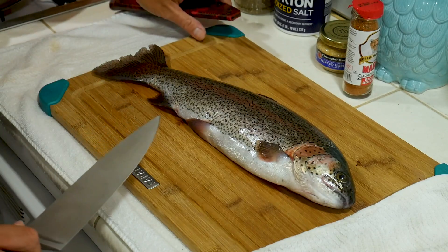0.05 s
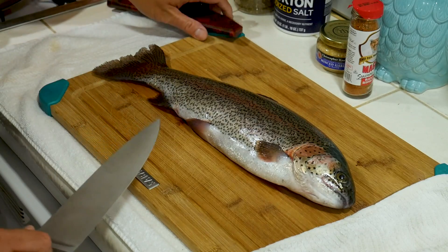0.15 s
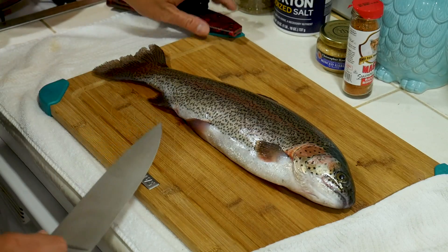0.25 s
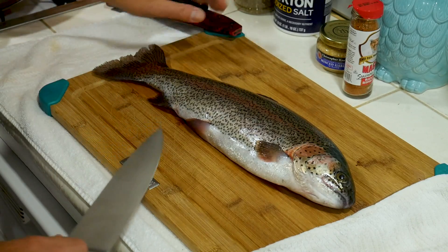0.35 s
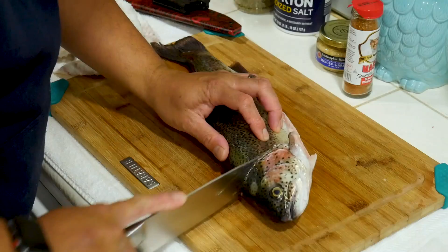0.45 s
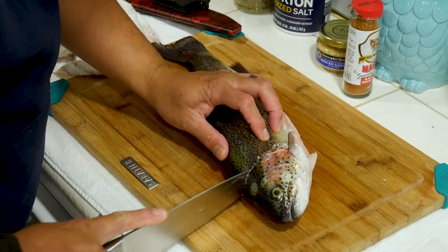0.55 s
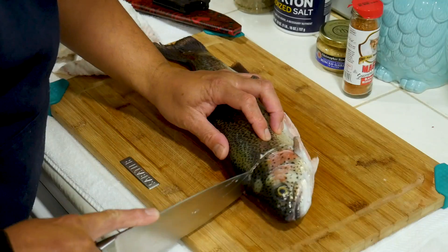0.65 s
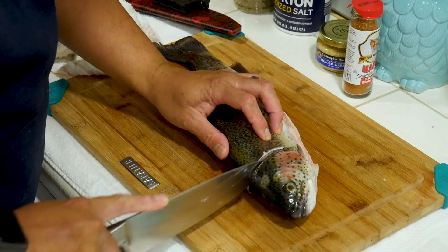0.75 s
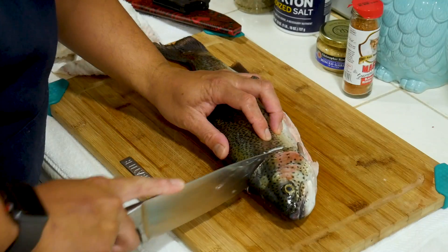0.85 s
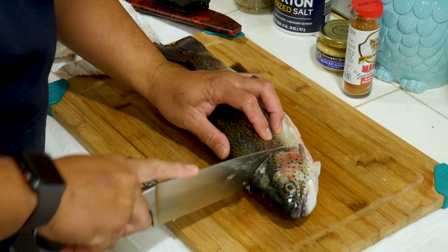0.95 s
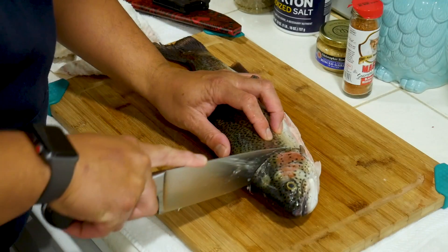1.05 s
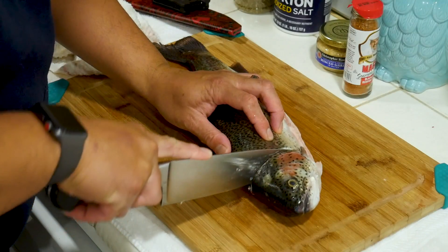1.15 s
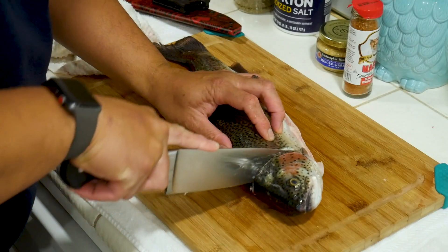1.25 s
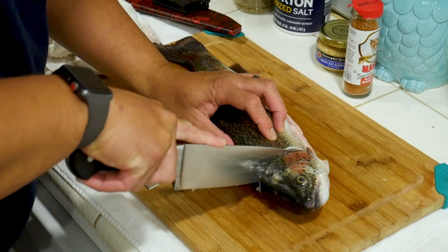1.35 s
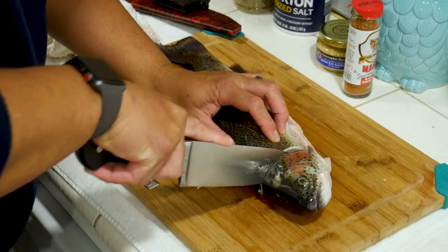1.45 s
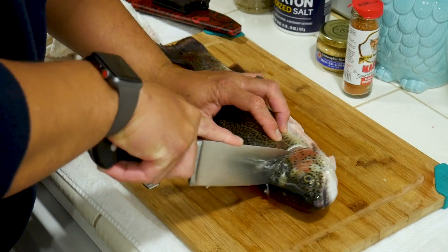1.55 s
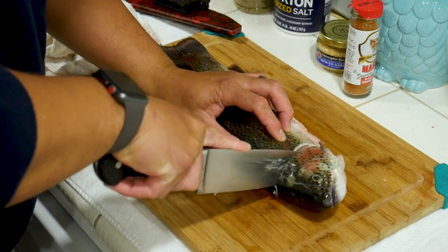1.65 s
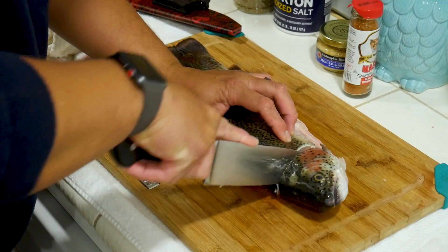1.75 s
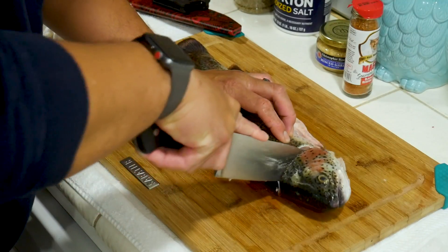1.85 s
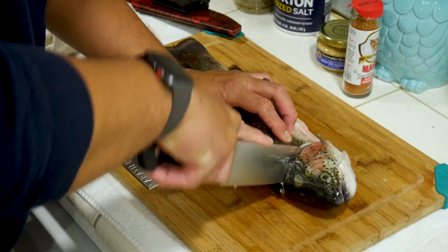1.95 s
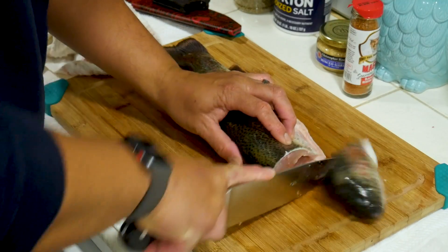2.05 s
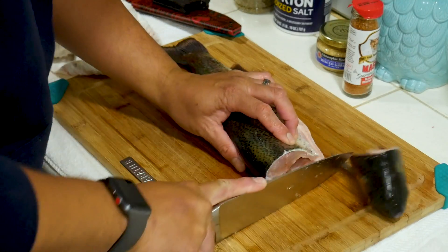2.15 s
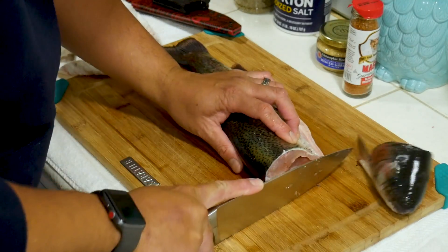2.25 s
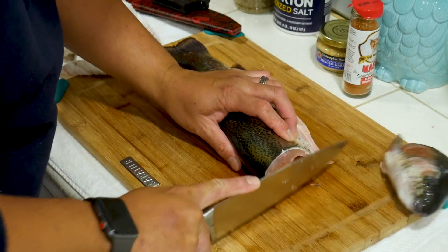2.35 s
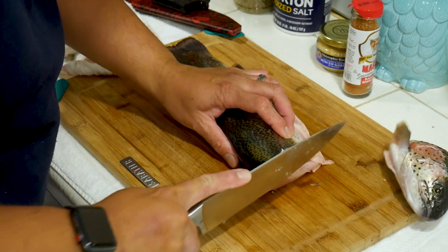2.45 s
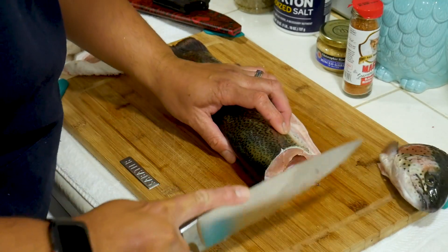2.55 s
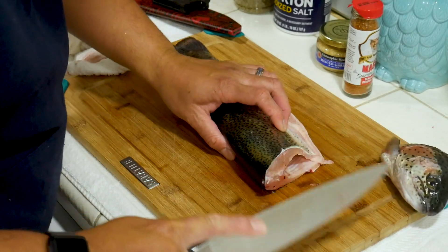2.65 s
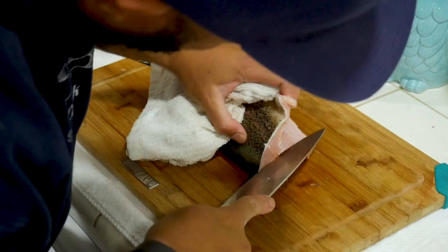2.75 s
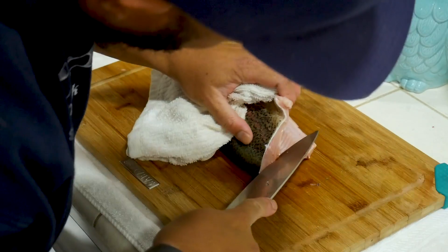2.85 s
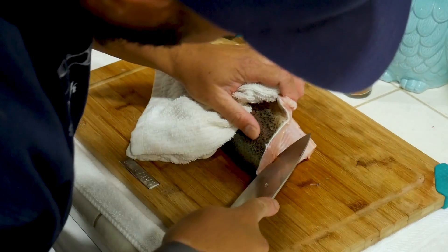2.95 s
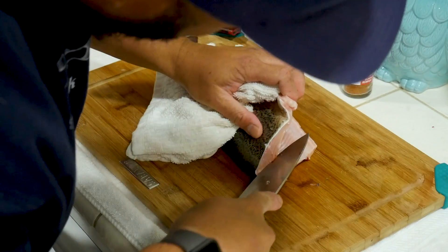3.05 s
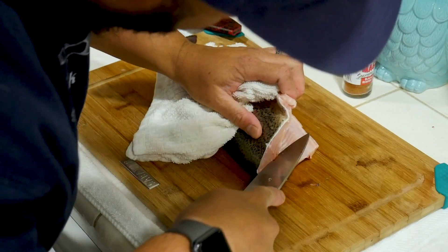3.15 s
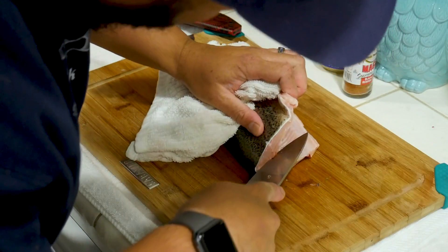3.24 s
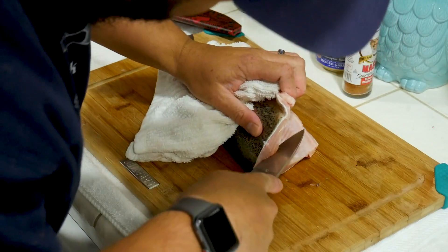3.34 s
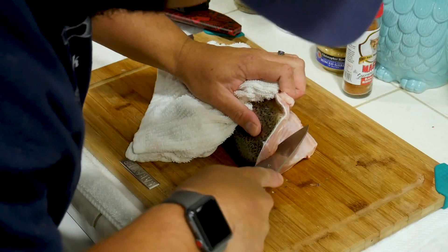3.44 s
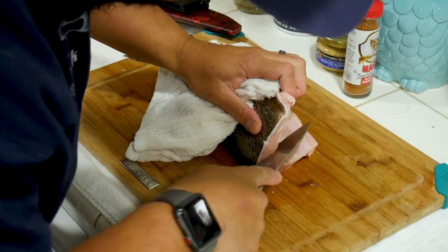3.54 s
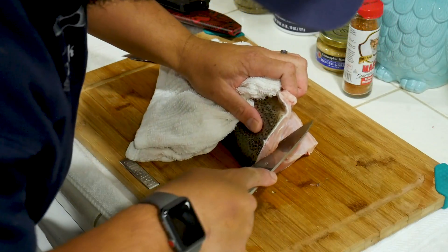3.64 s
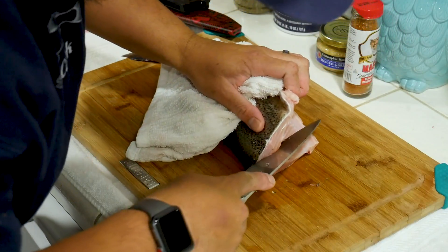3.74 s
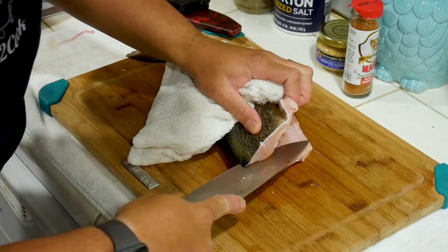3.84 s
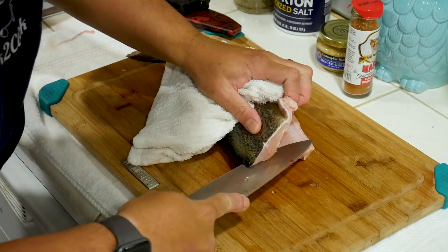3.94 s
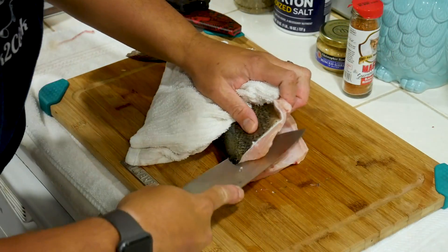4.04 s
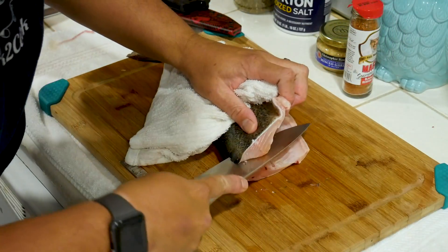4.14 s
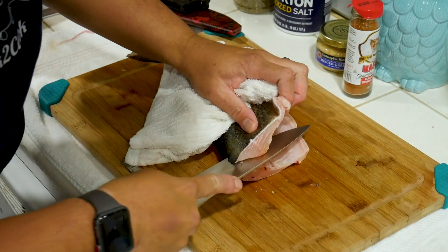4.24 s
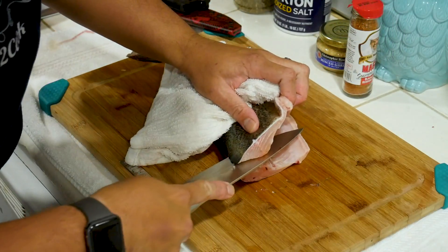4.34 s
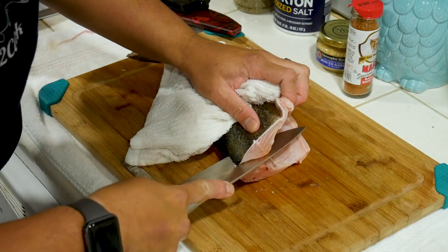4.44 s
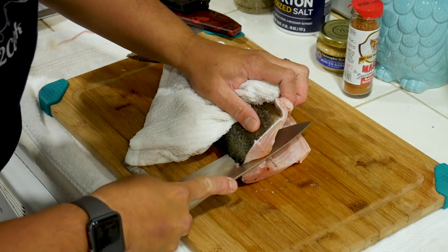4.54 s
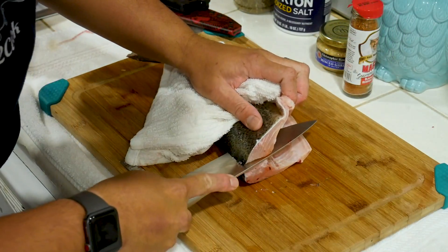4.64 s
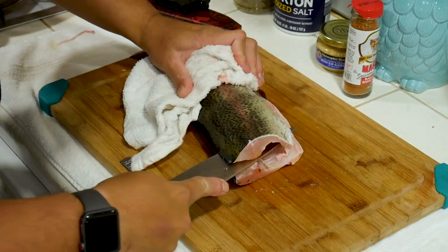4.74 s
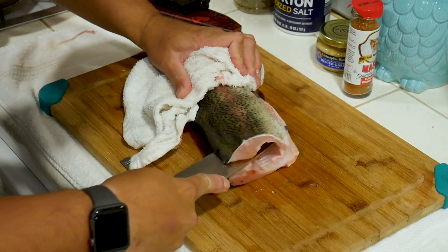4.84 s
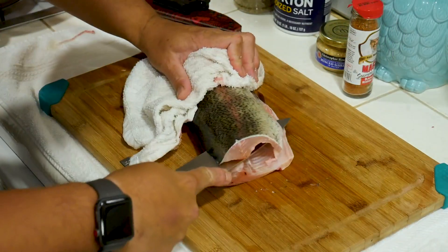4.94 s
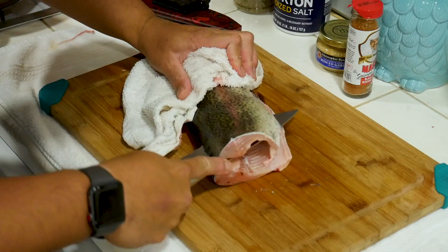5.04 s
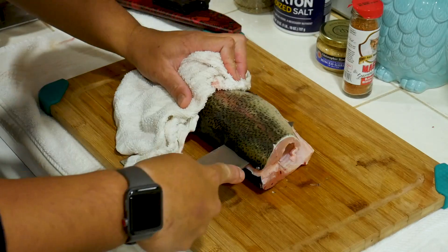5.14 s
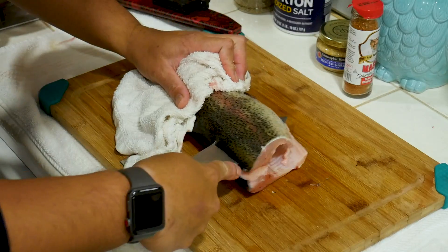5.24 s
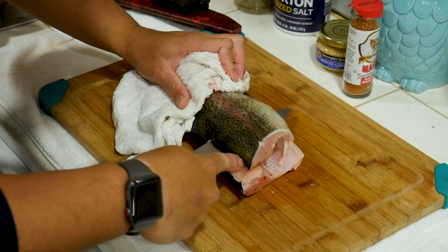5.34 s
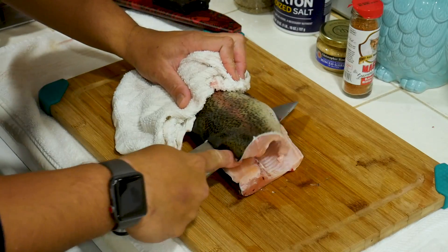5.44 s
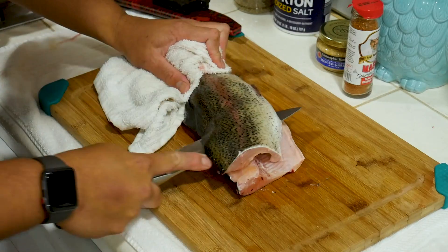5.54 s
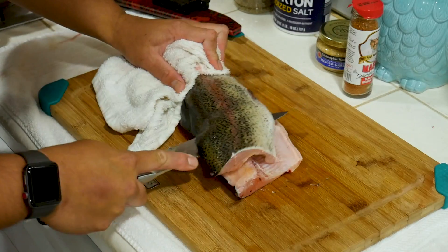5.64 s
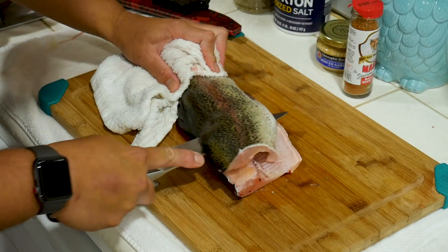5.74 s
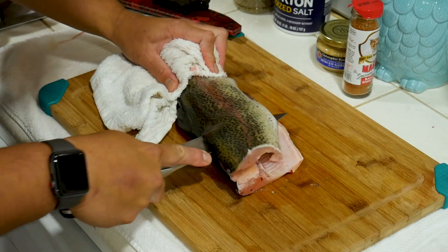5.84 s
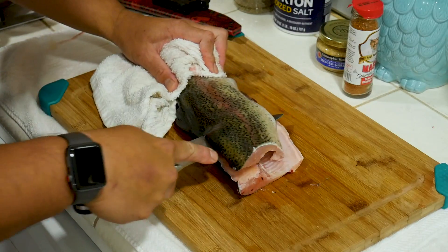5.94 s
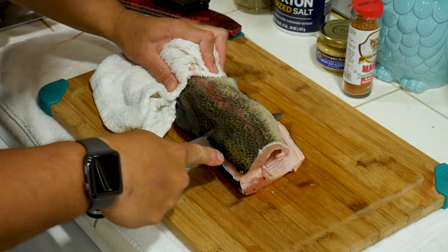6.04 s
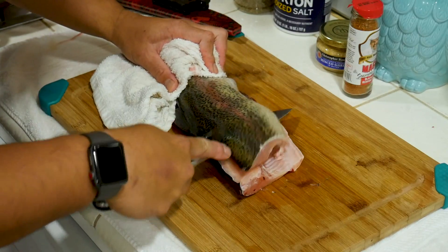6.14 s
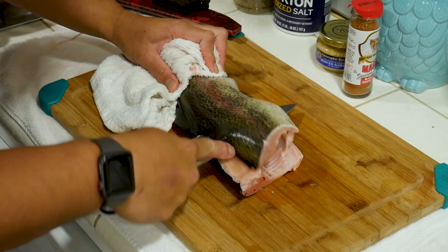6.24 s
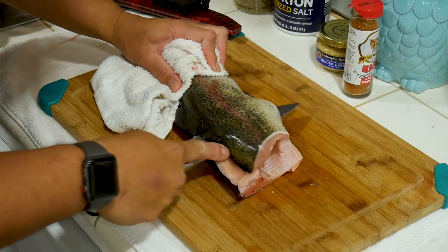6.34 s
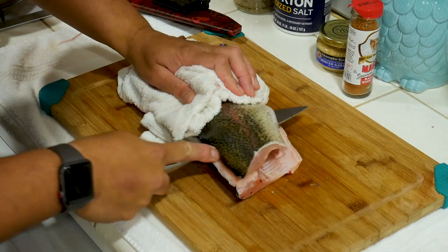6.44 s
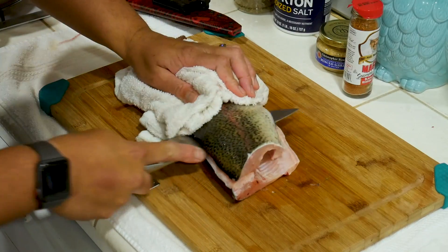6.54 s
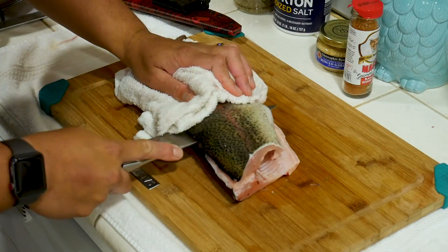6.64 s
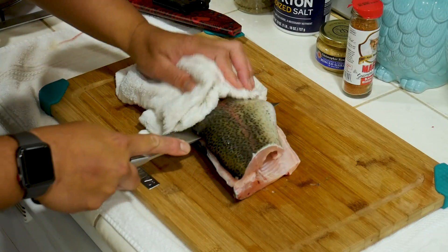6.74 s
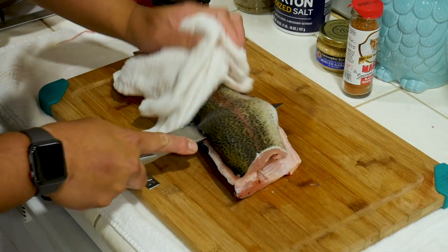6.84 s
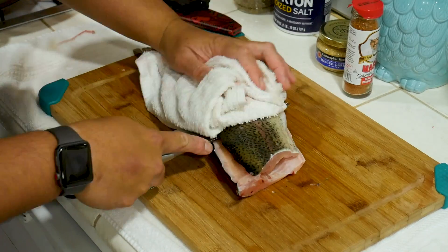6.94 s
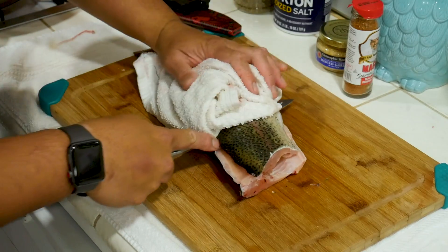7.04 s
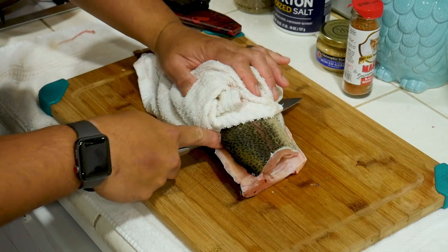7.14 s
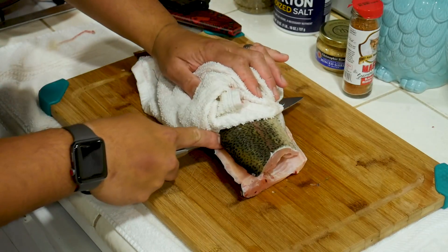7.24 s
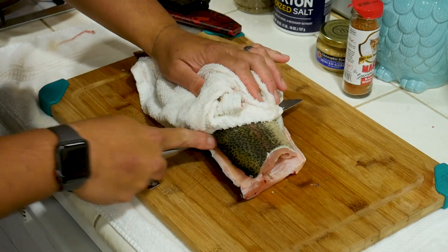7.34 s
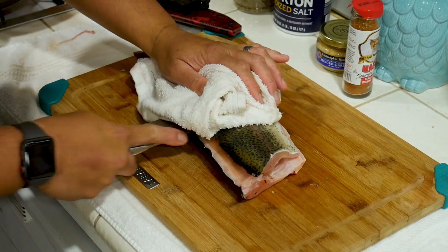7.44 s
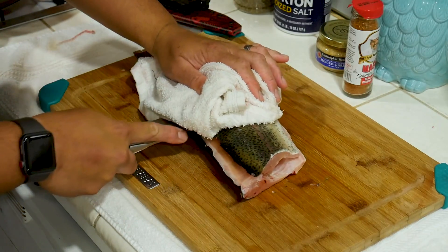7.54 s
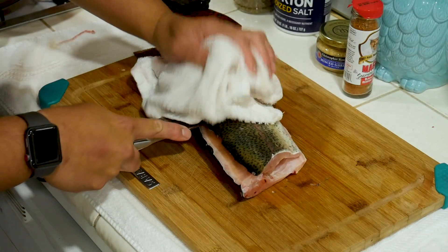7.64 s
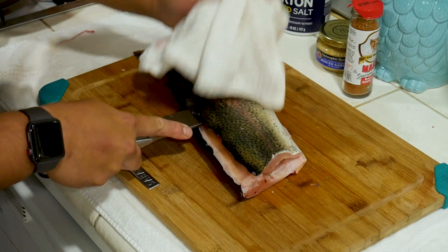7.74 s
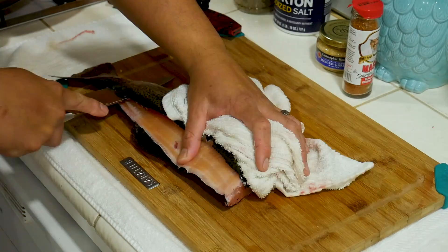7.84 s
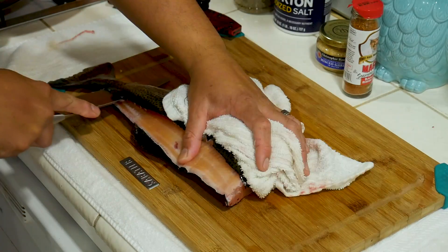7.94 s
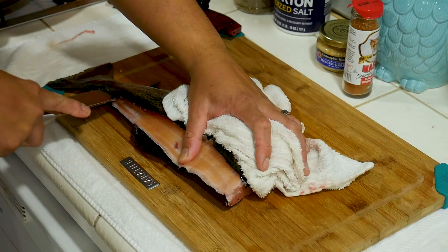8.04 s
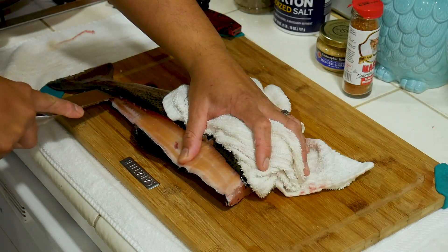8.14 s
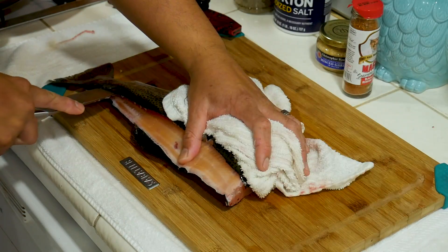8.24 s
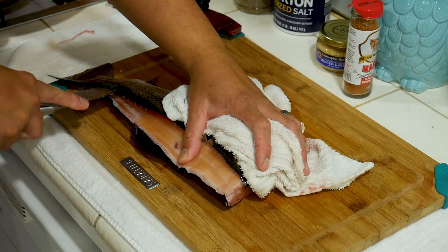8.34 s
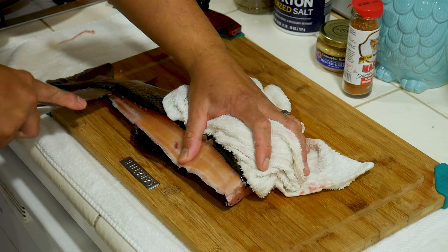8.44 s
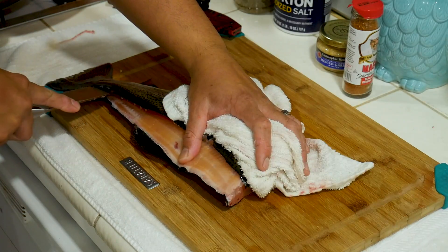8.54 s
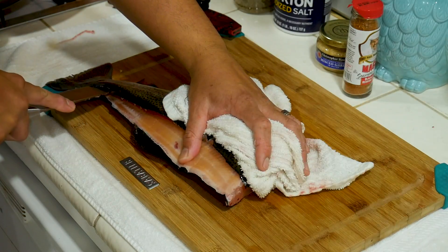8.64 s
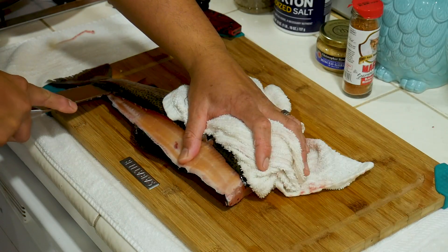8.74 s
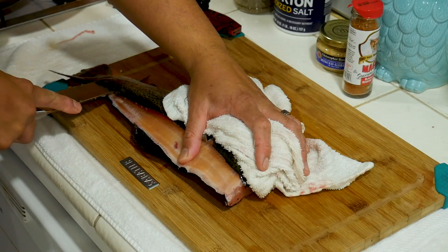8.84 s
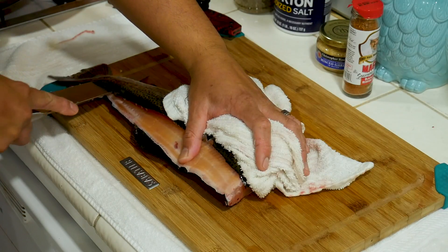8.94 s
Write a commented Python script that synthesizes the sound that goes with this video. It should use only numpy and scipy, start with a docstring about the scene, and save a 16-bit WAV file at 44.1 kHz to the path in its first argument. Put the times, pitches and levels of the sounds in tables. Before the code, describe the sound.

Utensil clatters onto a wooden board, then a knife crunches through fish bones with one very sharp crack, followed by gritty slicing strokes in a small kitchen.

```python
"""A fish is filleted on a bamboo board in a small tiled kitchen, close to one microphone.
First a utensil rattles down: rough contacts ring the board modes and low swings rock it on the counter.
From 0.5 s the knife strokes hiss as grainy noise through steel resonances, and rubs sing as throbbing narrow noise.
Bones snap as clicks with noise sprays, hardest at 1.85 s; fainter landings are scattered from 1.2 to 2.1 s.
Throughout, tiles answer with decaying noise echoes, over shaped-noise hum, rumble and very faint stereo noise."""
import sys
import numpy as np
from scipy import signal
from scipy.fft import rfft, irfft, next_fast_len
from scipy.io import wavfile
from scipy.ndimage import uniform_filter1d, map_coordinates

SR = 44100
rng = np.random.default_rng(int(sys.argv[2]) if len(sys.argv) > 2 else 0)


def master_out(mix):
    """Clip the mix to full scale and print it as 16-bit PCM to the path in sys.argv[1]."""
    frames = np.transpose(np.atleast_2d(mix))
    ceiling = np.clip(frames, -1, 1)
    pcm = np.round(ceiling * 32767).astype(np.int16)
    wavfile.write(sys.argv[1], SR, pcm)


N = 396459

# bones giving way under the edge: t/s, force level/dB, click pitch f/Hz
BONE_SNAPS = [(.5658, -39.5, 3970), (.6918, -47, 8000), (0.7567, -45.5, 7460), (1.1429, -28.5, 8360),
              (1.2056, -26.5, 8940), (1.4677, -25.5, 8350), (1.496, -30.5, 8600), (1.516, -17, 8400),
              (1.5314, -15, 7400), (1.5513, -31, 7800), (1.8538, -1, 5400), (2.0242, -22.5, 4310),
              (2.0323, -10.5, 3960), (2.0406, -8, 7800), (2.0467, -10, 6750), (2.0506, -8, 3540),
              (2.5939, -44.5, 7030), (3.1661, -40.5, 13500), (3.3038, -19.5, 12600), (3.3468, -18, 4960),
              (3.3532, -21, 3400), (3.3826, -16, 7700), (3.4163, -27, 7900), (3.7973, -29, 8300),
              (3.8734, -45, 8600), (4.0328, -25, 8700), (4.0591, -24, 8390), (4.0684, -23, 2840),
              (4.0754, -17.5, 8000), (4.0975, -20, 7740), (4.124, -24, 2750), (4.4794, -35, 12300),
              (4.529, -20.5, 12400), (4.5595, -29.5, 7340), (4.8643, -29.5, 8400), (4.876, -29.5, 7010),
              (4.8986, -27.5, 8050), (4.9256, -25.5, 13100), (4.955, -27.5, 10000), (4.9908, -28, 7400),
              (5.014, -24, 13700), (5.0534, -18, 9700), (5.0865, -27.5, 7250), (5.2369, -26, 7950),
              (5.2726, -26.5, 7560), (5.2917, -17.5, 8200), (5.3541, -18, 4100), (5.3674, -22, 7240),
              (5.3849, -27, 7300), (5.6295, -16, 8600), (6.072, -36.5, 7450), (6.0822, -37, 4600),
              (6.2136, -26.5, 8500), (6.2272, -19.5, 6300), (6.5858, -16, 2800), (6.587, -13, 7780),
              (6.614, -24, 3400), (6.629, -27, 7880), (6.6404, -28, 14600), (6.6527, -24, 7670),
              (6.8877, -44, 3165), (6.922, -39.5, 9000), (7.0568, -30, 6000), (7.0723, -29, 3630),
              (7.148, -44, 11000), (7.3453, -48, 7370), (7.4011, -33, 3390), (7.4115, -18, 3700),
              (7.4176, -19, 4000), (7.4257, -18, 5450), (7.4398, -22, 4430), (7.4796, -22, 4900),
              (7.5158, -31, 3910), (7.7574, -50, 7600), (7.858, -50, 8700), (7.9543, -43, 7508),
              (8.317, -40, 8440), (8.402, -32, 8670), (8.5352, -19, 2730), (8.5622, -35, 7300)]
# knife strokes: start t/s, rise t/s, fall t/s, firmest level/dB, tint f/Hz
KNIFE_STROKES = [(.498, .033, 0.14, -60, 7500), (.69, .03, .06, -66, 12000), (0.899, .03, 0.17, -58, 7800),
                 (1.21, .02, .2, -59, 8000), (1.457, 0.072, 0.032, -44.5, 7800),
                 (2.022, 0.025, .028, -26, 8250), (2.338, 0.042, 0.15, -59.5, 7550),
                 (3.3, .064, 0.067, -53.5, 8000), (3.783, .012, 0.1, -58, 8000),
                 (4.023, 0.05, 0.045, -37, 8000), (4.27, 0.068, 0.064, -56.5, 8200),
                 (4.468, 0.092, .11, -52, 8140), (4.864, 0.013, 0.16, -45.5, 7600),
                 (5.01, 0.035, .105, -47, 7600), (5.194, 0.086, 0.061, -47, 7900),
                 (5.353, .012, .071, -41, 7150), (5.541, .05, 0.17, -53.5, 5800),
                 (6.016, 0.082, .045, -58.5, 4481), (6.132, 0.081, .22, -53, 8700),
                 (6.528, 0.053, 0.016, -55, 2800), (6.592, 0.037, 0.071, -40, 4500),
                 (6.76, .13, .05, -58, 3300), (7.05, .025, .1, -52.5, 6000), (7.36, .065, 0.1, -41, 3902),
                 (7.891, 0.18, 0.182, -46.5, 7000), (8.288, 0.07, .073, -46.5, 8300),
                 (8.542, .03, .15, -46, 7900), (8.778, .03, .12, -56, 8050)]
# spectrum of the sliding edge: f/Hz, level per Hz/dB
EDGE_SPECTRUM = [(240, -37), (400, 4), (949, 2), (2180, -3.5), (2840, -3.5), (3870, -2), (7750, 0),
                 (9920, -7), (13700, -3), (16000, -14)]
# blade resonances: f/Hz, width f/Hz, level/dB
BLADE_MODES = [(3920, 640, -23.5), (5050, 200, -7), (7530, 480, -5.5), (8640, 620, 2), (12700, 850, -9)]
# blade or board set singing by a rub: start t/s, end t/s, bending f/Hz, level/dB, squeak f/Hz, squeak level/dB
RUB_SONGS = [(.5, .654, 1590, -60, 2810, -66), (.9, 1.04, 1450, -70, 2800, -68),
             (4.27, 4.333, 1140, -70, 4230, -65), (4.469, 4.677, 1103, -65, 3320, -64),
             (4.871, 4.96, 1005, -49, 4080, -54), (4.96, 5.054, 1000, -50, 3850, -55),
             (5.054, 5.147, 1005, -52.5, 3520, -51), (5.232, 5.31, 1150, -50, 3720, -70),
             (5.355, 5.422, 1153, -42, 3705, -54), (6.025, 6.103, 1300, -70, 4640, -65),
             (6.209, 6.298, 1320, -64, 3225, -57.5), (6.6, 6.689, 1304, -44, 3530, -52),
             (6.6, 6.667, 1830, -48, 4520, -67), (7.05, 7.2, 1140, -65, 3735, -61),
             (7.395, 7.466, 1194, -41.5, 3800, -47), (8.021, 8.2, 1410, -62, 5160, -63),
             (8.31, 8.42, 1408, -61, 4210, -63)]
# utensil or blade landing on the board: t/s, level/dB, favoured f/Hz
LANDINGS = [(.057, -13.5, 1510), (.064, -12.5, 1460), (.117, -17.5, 1500), (.124, -15, 1470),
            (.167, -19.5, 900), (.211, -7.5, 816), (.222, -14, 600), (.275, -15.5, 1290), (.28, -16, 910),
            (.31, -20, 1200), (.324, -18, 1400), (.363, -28.5, 1480), (1.205, -35, 750), (1.5, -31, 350),
            (1.855, -27, 402), (1.91, -33, 700), (1.938, -34, 704), (1.981, -38, 700), (2.024, -21.5, 458),
            (2.033, -24, 280), (2.044, -21.5, 449), (2.088, -27, 600), (2.119, -30, 600)]
# bamboo board modes: f/Hz, level/dB, t60/s
BOARD_MODES = [(275, -5, .15), (349.5, -2, 0.066), (516.3, 4, .09), (651, -1.5, 0.039), (842, 5.5, 0.045),
               (903, -5.5, 0.033), (1264, -12, 0.046), (1484, 2.5, 0.07), (1697, -12.5, 0.056),
               (2060, -8, .04), (2430, 3, .05), (2760, -5, .05), (3300, -17, .04)]
# board rocking on the counter: t/s, level/dB
BOARD_THUMPS = [(.051, -40), (.21, -25.5), (1.21, -45), (1.51, -35), (1.857, -44), (2.049, -31.5),
                (3.347, -34), (5.619, -45), (6.603, -34.5), (7.079, -48), (7.419, -40)]
# tile reverberation: f/Hz, t60/s
TILE_T60 = [(200, 0.57), (1400, 0.67), (4000, 0.67), (10000, 0.43)]
# moments when the echoes break off: t/s
ECHO_STOPS = [.5, 2.02, 2.6, 3.895, 5.16, 6.91, 7.85]
# spectrum of kitchen air and appliances: f/Hz, level per Hz/dB
HUM_SPECTRUM = [(12, -46), (20, -11.5), (65, -1.5), (160, -14.5), (189, -5), (323, -6), (535, -17.5),
                (583, -14), (863, -20.5), (966, -22), (1600, -26), (1790, -28.5), (4050, -37), (13200, -41),
                (16500, -43)]
# background levels: t/s, hum level/dB, rumble level/dB
HUM_LEVELS = [(.6, -54, -61), (1.95, -52, -58), (2.14, -54, -55), (3.03, -53.5, -61), (3.43, -53, -55),
              (3.64, -53.5, -59.5), (5.34, -52.5, -54), (6.93, -51.5, -56), (7.59, -51, -53),
              (7.87, -53.5, -58), (8.99, -53, -57.5)]
# spectrum of the very faint stereo noise: f/Hz, level per Hz/dB
STEREO_NOISE_SPECTRUM = [(12, -52), (20, -7), (222, -17), (367, -18), (446, -8.5), (590, -16.5),
                         (12800, -16), (16000, -25)]

# parts of a snap: dB at 0 dB force, dB per dB of force
CLICK_DB, CLICK_DB_PER_DB, SPRAY_DB, SPRAY_DB_PER_DB = 3.5, 1.37, -9, .84
PUSH_DB, PUSH_DB_PER_DB, PUSH_MAX_DB = -11.5, .8, -24  # flesh returns no more than the maximum
SPRAY_T60_S, SPRAY_T60_S_PER_DB = .056, .0007  # splinters fly longer after a harder break
TICKS_PER_S, TICK_MIN_FORCE_DB = 1, -54  # faint wet ticks of scales and fingers
BITE_DB_PER_S, LIFT_DB, LIFT_DB_PER_S, ROUND_POWER = 130, 4, 55, 1.5  # stroke swell, easing off and linger
SONG_RISE_SHARE = .015  # the pitch climbs as the blade digs in
CRACK_DB, CRACK_DB_PER_DB = -19.5, .45  # the bright crack of a landing grows less than its ring
ROCK_HZ, ROCK_SCATTER_SHARE = 70.3, .06
NEW_ECHO_S, ECHO_DB = .4, -8.0
HUM_SPLIT_HZ, TOP_HZ = 110, 16700


def amp(db):
    """Gain of a level in dB."""
    return 10 ** (np.asarray(db) / 20)


def unit(x):
    """x at rms 1."""
    return x / np.sqrt(np.mean(x ** 2) + 1e-20)


def along(points, hz):
    """Interpolates (Hz, value) points on a log frequency axis."""
    f, v = np.transpose(points)
    return np.interp(np.log(hz + 1), np.log(f + 1), v)


def curves(rows):
    """One value per sample for each column after the time."""
    s, *cols = np.transpose(rows)
    return [np.interp(np.arange(N) / SR, s, c) for c in cols]


def wobble(knots_per_s):
    """A smooth random curve through normal knots."""
    knots = rng.standard_normal(int(N * knots_per_s / SR) + 4)
    return map_coordinates(knots, [np.arange(N) * knots_per_s / SR])


def filtered(x, response):
    """x times a complex response of frequency."""
    n = x.shape[-1]
    m = next_fast_len(n + 4096)
    return irfft(rfft(x, m) * response(np.fft.rfftfreq(m, 1 / SR)), m)[..., :n]


def resonance(hz, centre_hz, width_hz):
    """Causal response of one resonance, gain 1 at its centre."""
    return 1j * hz * width_hz / (centre_hz ** 2 - hz ** 2 + 1j * hz * width_hz + 1e-9)


def add(track, s, sound):
    """Mixes a sound into the track from time s."""
    track[round(s * SR):][:len(sound)] += sound


def snaps():
    """A bone breaks: a click that rules the hardest breaks, a spray of splinters, a small push into the flesh."""
    out, t = np.zeros(N + SR), np.arange(SR // 10) / SR
    draws = rng.random((int(TICKS_PER_S * N / SR), 3))
    ticks = [(a * N / SR, TICK_MIN_FORCE_DB + 6 * b, 5000 + 7000 * c) for a, b, c in draws]
    for s, db, hz in BONE_SNAPS + ticks:
        noise = rng.standard_normal((2, len(t)))
        click = np.sin(2 * np.pi * hz * t) * np.exp(-((t - .0004) / .00022) ** 2)
        spray_t60_s = max(SPRAY_T60_S + SPRAY_T60_S_PER_DB * db, .003)
        spray = filtered(noise[0] * amp(-60 * t / spray_t60_s),
                         lambda f: amp(-5.5) * resonance(f, 8500, 13000) + resonance(f, hz, 0.082 * hz))
        push = filtered(noise[1] * amp(-60 * t / 0.042), lambda f: resonance(f, 900, 1800))
        push_db = min(PUSH_DB + PUSH_DB_PER_DB * db, PUSH_MAX_DB)
        snap = amp(CLICK_DB + CLICK_DB_PER_DB * db) * click
        snap += amp(SPRAY_DB + SPRAY_DB_PER_DB * db) * spray
        add(out, s, snap + amp(push_db) * push)
    return out[:N]


def blade_hiss():
    """The edge catches on scales and ribs: uneven grains in a hiss, coloured by the steel."""
    grain_gain = amp(np.minimum(5.4 * rng.exponential(1, N), 18))
    grains = rng.standard_normal(N) * grain_gain * (rng.random(N) < 900 / SR)  # 900 a second on average
    rough = rng.standard_normal(N) * amp(1.2 * wobble(60) + 1.84 * wobble(250))
    rub = unit(rough) + 0.33 * unit(grains)

    def steel(hz):
        """The blade resonances stand on a flat response."""
        return 1 + sum(amp(db) * np.abs(resonance(hz, c, w)) ** 2 for c, w, db in BLADE_MODES)

    hiss = unit(filtered(rub, lambda hz: amp(along(EDGE_SPECTRUM, hz)) * steel(hz)))
    # random soft patches in time and frequency make the hiss colour uneven
    z = signal.stft(hiss, nperseg=256)[2]
    patches = uniform_filter1d(rng.standard_normal(z.shape), size=5, axis=0)
    patches = uniform_filter1d(patches, size=12, axis=1)
    return signal.istft(z * amp(2.6 * unit(patches)), nperseg=256)[1]


def strokes():
    """Each stroke tints the hiss, swells to its firmest moment, lingers there and eases off."""
    out, hiss = np.zeros(N + SR), blade_hiss()
    for start, rise, fall, firm_db, tint_hz in KNIFE_STROKES:
        t = np.arange(round((rise + fall) * SR)) / SR
        piece = filtered(hiss[round(start * SR):][:len(t)],
                         lambda hz: 1 + 0.44 * resonance(hz, tint_hz, 0.15 * tint_hz))
        depth_db = np.where(t < rise, BITE_DB_PER_S * rise, LIFT_DB + LIFT_DB_PER_S * fall)
        slackness = np.interp(t, [0, rise, rise + fall], [1, 0, 1])  # 0 at the firmest moment
        level_db = firm_db - depth_db * slackness ** ROUND_POWER
        fade = np.clip(np.minimum(t, rise + fall - t) / 0.01, 0, 1)
        add(out, start, fade * amp(level_db) * unit(piece))
    return out[:N]


def songs():
    """Slipping contact keeps a bending mode and a sliding squeak going: narrow noise that throbs with the slips."""
    out = np.zeros(N + SR)
    blur_hz = np.array([[65], [65], [170], [170]])  # bend pair, squeak pair
    flutter = filtered(rng.standard_normal((4, N)), lambda hz: 1 / (1 + (hz / blur_hz) ** 2))
    flutter = flutter * amp(4 * wobble(55))
    for start, end, bend_hz, bend_db, squeak_hz, squeak_db in RUB_SONGS:
        u = np.linspace(0, 1, round((end - start) * SR))
        a, b, c, d = flutter[:, round(start * SR):][:, :len(u)]
        phase_per_hz = 2 * np.pi * np.cumsum(1 + SONG_RISE_SHARE * (u - .5)) / SR
        bend_phase, squeak_phase = bend_hz * phase_per_hz, squeak_hz * phase_per_hz
        bend = unit(a * np.sin(bend_phase) + b * np.cos(bend_phase))
        squeak = unit(c * np.sin(squeak_phase) + d * np.cos(squeak_phase))
        fade = amp(-7 * u) * np.clip(np.minimum(u, 1 - u) / 0.044, 0, 1)
        add(out, start, fade * (amp(bend_db) * bend + amp(squeak_db) * squeak))
    return out[:N]


def knocks():
    """A short rough contact rings the board; the place struck favours the modes near one pitch."""
    out, t = np.zeros(N + SR), np.arange(SR // 3) / SR
    for s, db, favoured_hz in LANDINGS:
        chance, noise = rng.standard_normal((len(BOARD_MODES), 2)), rng.standard_normal((3, len(t)))
        ring = np.zeros(len(t))
        for (hz, level_db, t60_s), (level_chance, pitch_chance) in zip(BOARD_MODES, chance):
            mode_db = level_db + 3 * level_chance - 8.5 * abs(np.log2(hz / favoured_hz))
            mode = np.sin(2 * np.pi * hz * (1 + 0.025 * pitch_chance) * t)
            ring += amp(mode_db - 60 * t / t60_s) * mode
        contact = (0.92 + noise[0]) * amp(-60 * t / 0.0014)  # a push with rough bumps on it
        contact = contact - contact[:SR // 200].mean() * (t < .005)  # no net push
        ring = signal.fftconvolve(ring, contact)[:len(t)]
        clatter = filtered(noise[1] * amp(-60 * t / 0.028),
                           lambda hz: resonance(hz, 1.16 * favoured_hz, 1400) ** 2)
        crack = filtered(noise[2] * amp(-60 * t / 0.06), lambda hz: resonance(hz, 3300, 5000) ** 2)
        knock = amp(db + 0.5) * ring / np.abs(ring).max()
        knock += amp(db + 6) * clatter
        add(out, s, knock + amp(CRACK_DB + CRACK_DB_PER_DB * db) * crack)
    return filtered(out[:N], lambda hz: resonance(hz, 2000, 30000))  # a small board sends out little bass


def thumps():
    """Each push rocks the board on the counter: one soft low decaying swing."""
    out, t = np.zeros(N + SR), np.arange(SR // 3) / SR
    for s, db in BOARD_THUMPS:
        hz = ROCK_HZ * (1 + ROCK_SCATTER_SHARE * rng.standard_normal())
        soft_onset = 1 - np.exp(-t / .008)
        add(out, s, amp(db - 60 * t / .25) * np.sin(2 * np.pi * hz * t) * soft_onset)
    return out[:N]


def tiles(x):
    """The walls answer, each frequency dying at its own speed, as noise shaped by the decay times."""
    out = np.zeros(N + 2 * SR)
    # a fresh random echo pattern starts every 0.4 s and wherever the echoes break off
    marks = np.union1d(np.arange(0, N / SR + NEW_ECHO_S, NEW_ECHO_S), ECHO_STOPS)
    for start, end in zip(marks[:-1], marks[1:]):
        hz, t, z = signal.stft(rng.standard_normal(SR // 2 + SR // 4), SR, nperseg=256)
        decay = amp(-60 * t / along(TILE_T60, hz)[:, None])
        cluster = 0.77 * amp(-60 * t / 0.063)  # short dense echoes from near surfaces
        tail = signal.istft(z * (decay + cluster), SR, nperseg=256)[1]
        echo = signal.fftconvolve(x[round(start * SR):round(end * SR)], tail / np.linalg.norm(tail))
        stop = min([s for s in ECHO_STOPS if s > start] + [N / SR])
        after_s = np.maximum(start + np.arange(len(echo)) / SR - stop, 0)
        add(out, start + .004, echo * amp(-60 * after_s / 0.054))
    return out[:N]


def kitchen():
    """Air and appliances: a gently wavering hum, with a rumble that comes and goes on its own."""
    hum_db, rumble_db = curves(HUM_LEVELS)
    hum = unit(filtered(rng.standard_normal(N),
                        lambda hz: amp(along(HUM_SPECTRUM, hz)) * (hz > HUM_SPLIT_HZ)))
    rumble = unit(filtered(rng.standard_normal(N),
                           lambda hz: amp(along(HUM_SPECTRUM, hz)) * (hz <= HUM_SPLIT_HZ)))
    return amp(hum_db + 1.1 * wobble(4.79)) * hum + amp(rumble_db + 1.6 * wobble(1.9)) * rumble


def scene():
    """Everything reaches one microphone; only the near sounds excite the tiles."""
    near = snaps() + strokes() + songs() + knocks()
    mono = near + thumps() + amp(ECHO_DB) * tiles(near) + kitchen()
    return np.array([mono, mono])


def record(dry):
    """Very faint wavering stereo noise, opposite in sign left and right; the extreme treble droops, then ends."""
    noise = unit(filtered(rng.standard_normal(N), lambda hz: amp(along(STEREO_NOISE_SPECTRUM, hz))))
    noise = amp(-73 + 2.7 * wobble(12)) * noise
    wide = np.clip(dry, -1, 1) + np.array([noise, -noise])

    def band(hz):
        """A steep droop around 15.7 kHz, then nothing from the limit up."""
        droop = 1 - .85 / (1 + (15700 / (hz + 1)) ** 50)
        return droop * (hz < TOP_HZ)

    return filtered(wide, band)


dry = scene()
out = record(dry)
master_out(out)
```